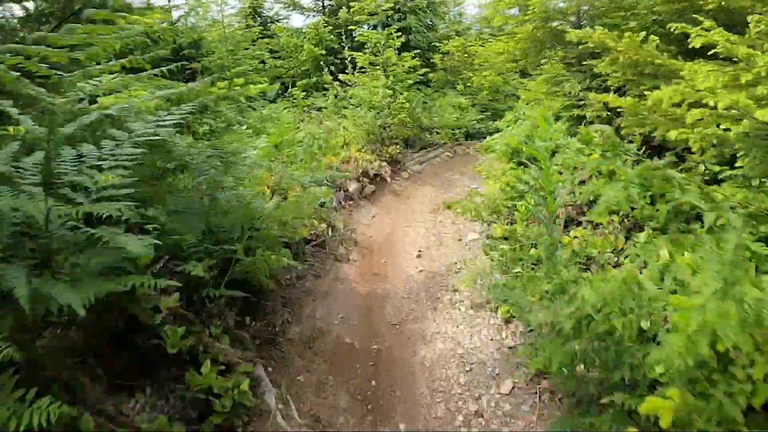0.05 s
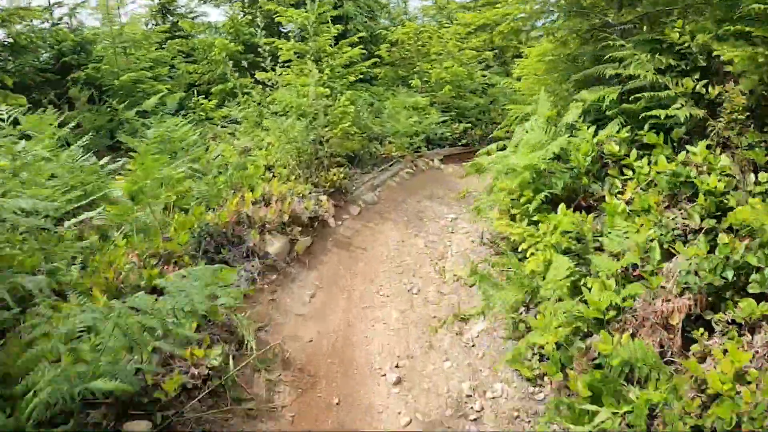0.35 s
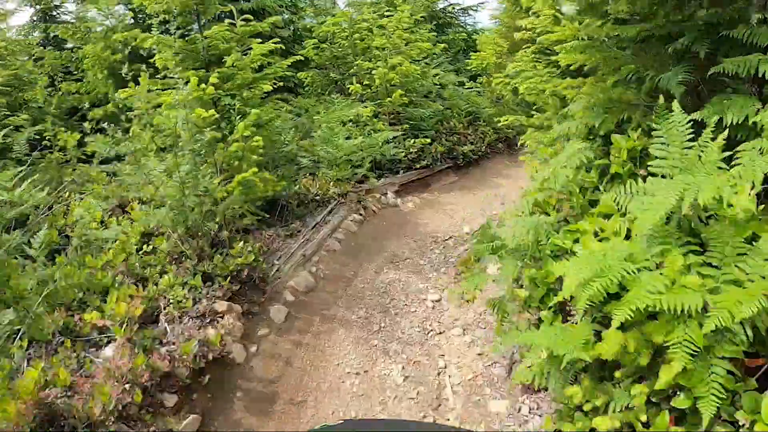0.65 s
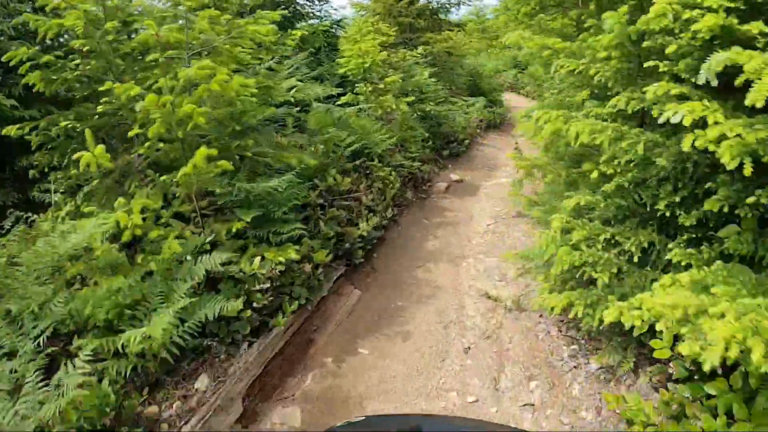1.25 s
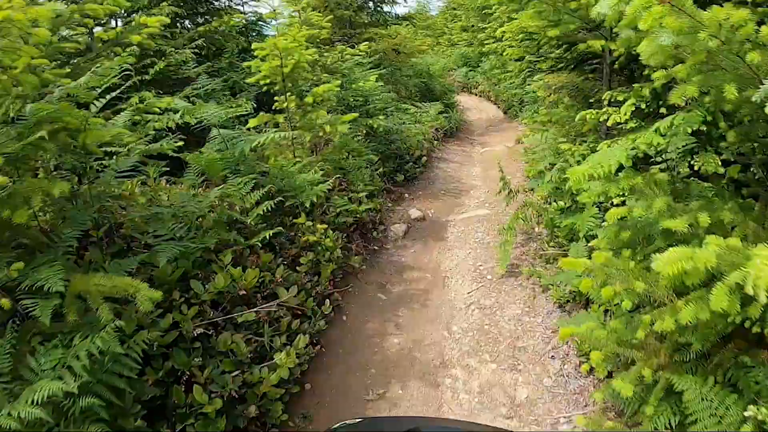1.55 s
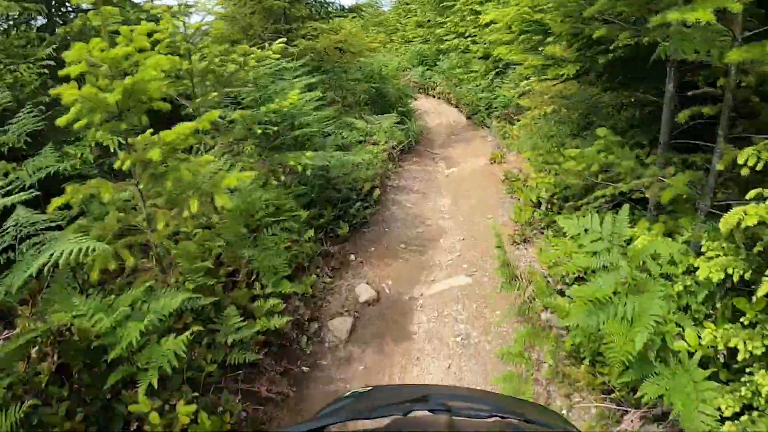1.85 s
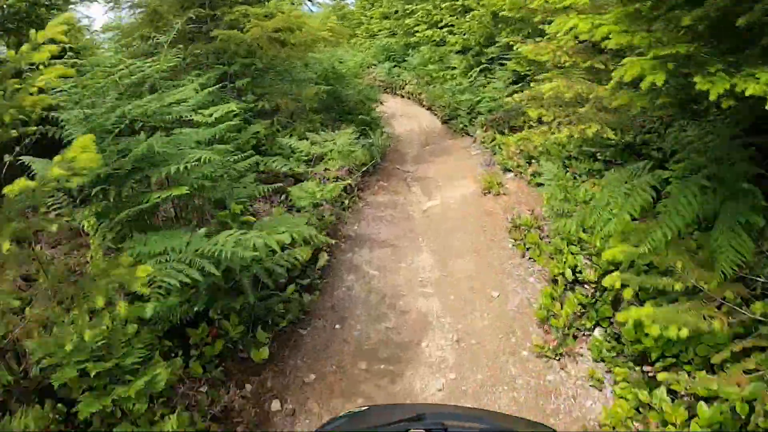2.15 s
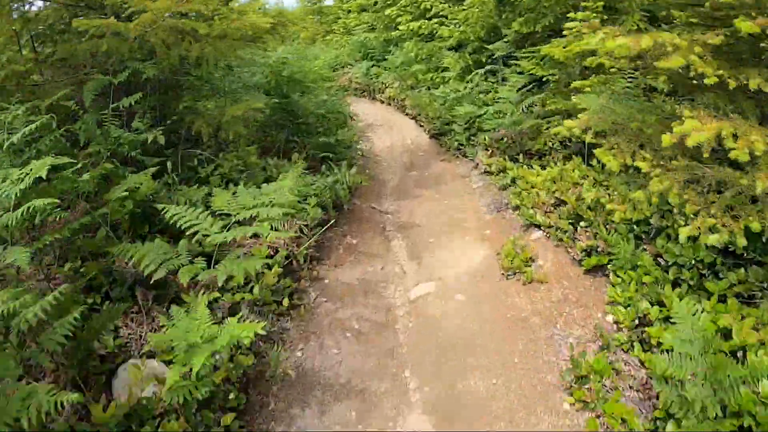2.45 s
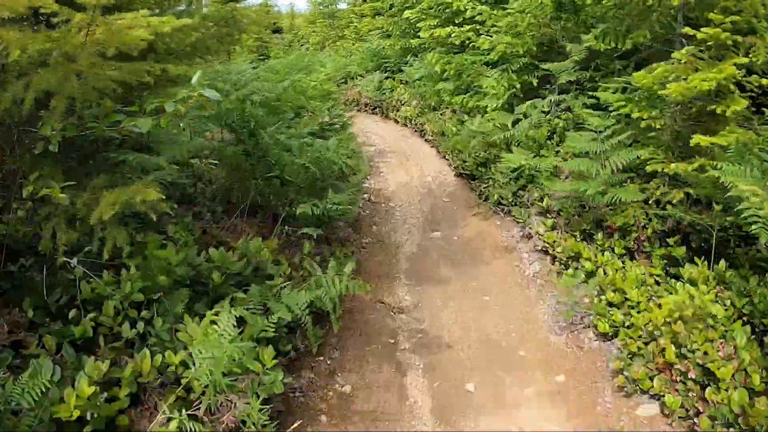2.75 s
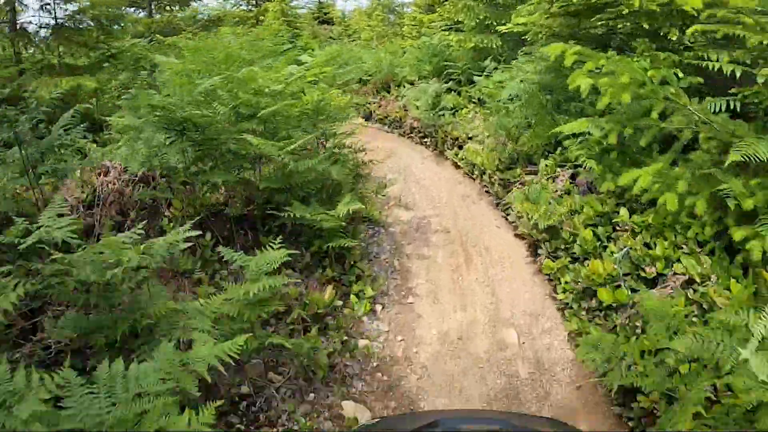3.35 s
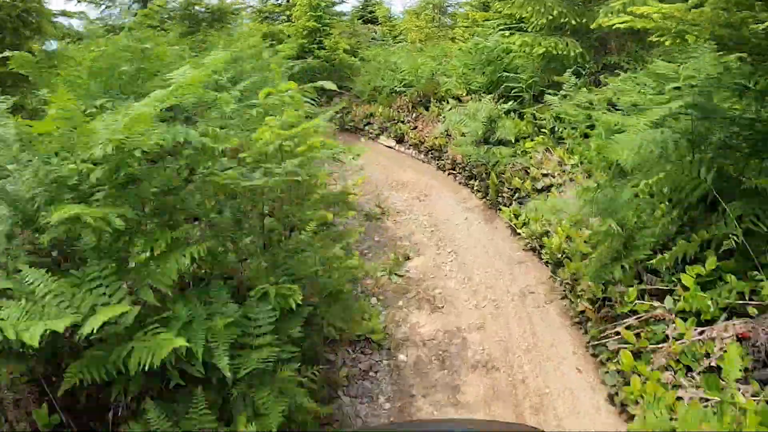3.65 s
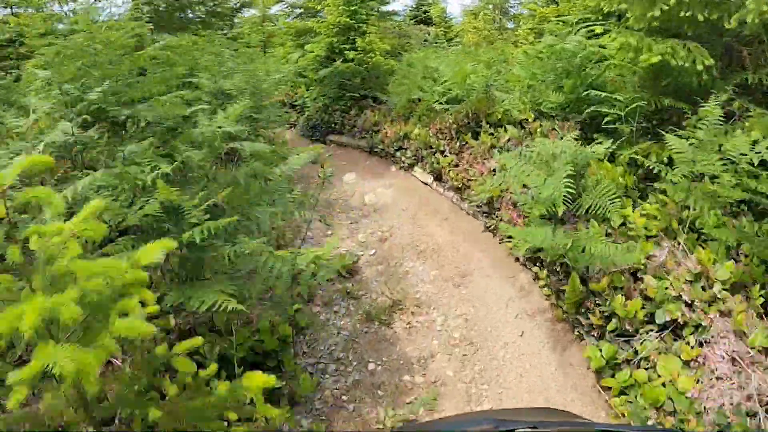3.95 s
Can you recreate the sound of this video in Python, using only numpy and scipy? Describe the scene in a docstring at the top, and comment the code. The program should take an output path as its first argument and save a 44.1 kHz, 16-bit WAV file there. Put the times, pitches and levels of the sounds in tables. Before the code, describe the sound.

Rough mountain bike brake squeals, one long and one short, over wind and gravel crunch.

```python
"""Mountain bike braking on gravel

Heard from the rider. Wind buffets the microphone; freewheel pawls buzz faintly.
Tyres crunch over grit, pop pebbles and knock against stones; the chain slaps the frame.
The disc brake whistles very high, squeals in rough stick-slip bursts, and bites again at the end."""
import sys
import numpy as np
from scipy import signal
from scipy.fft import rfft, irfft
from scipy.io import wavfile
from scipy.ndimage import uniform_filter1d

SR = 44100
rng = np.random.default_rng(int(sys.argv[2]) if len(sys.argv) > 2 else 0)


def dump_mix(stems):
    """Bounce the given channels to the path in sys.argv[1] as a 16-bit WAV at rate SR."""
    frames = np.atleast_2d(stems).T  # one column per channel
    limited = np.clip(frames, -1, 1)  # hard clip at full scale
    pcm = np.round(limited * 32767).astype(np.int16)
    wavfile.write(sys.argv[1], SR, pcm)


N = 176400

# wind spectrum (frequency [Hz], relative density [dB])
WIND_SPECTRUM = [(8.8, -29), (15, -4.5), (53, 2), (106, -3), (132, -5), (165, -15.5), (201, -15.5),
                 (240, -22.5), (420, -33), (550, -52), (920, -120)]
# wind strength (time [s], rumble [dB], buffeting [dB])
WIND_LEVELS = [(0.0, -20, -26), (0.34, -31, -31.5), (0.38, -21.5, -26.5), (0.78, -24.5, -26.5),
               (0.81, -21.5, -22.5), (1.11, -28, -33), (1.18, -20.5, -35), (1.25, -22, -21),
               (1.28, -22.5, -27.5), (1.54, -20, -26.5), (1.78, -20.5, -30.5), (2.18, -23.5, -27.5),
               (2.23, -27, -32.5), (2.38, -23.5, -21), (2.43, -20.5, -31.5), (2.64, -23, -21),
               (3.95, -23, -33.5), (4.0, -28, -26.5)]
# hub resonances (frequency [Hz], width [Hz], relative level [dB])
HUB_MODES = [(2230, 290, 1), (6270, 450, -0.5), (7570, 460, 4), (10100, 960, -8.5)]
# tyre rush spectrum (frequency [Hz], relative density [dB])
TYRE_SPECTRUM = [(150, -6), (260, -5.5), (400, -6), (650, -7.5), (950, -4.5), (1300, -7.5), (1750, -10),
                 (2300, -12), (3000, -16.5), (3800, -17), (4700, -21.5), (5400, -24.5), (6800, -28),
                 (8300, -30.5), (10000, -36), (11300, -39.5), (13500, -52)]
# tyre rush bands before trim (time [s], low [dB], middle [dB], upper [dB], treble [dB])
TYRE_LEVELS = [(0.03, -40.5, -43.5, -43, -52.5), (0.25, -37.5, -41.5, -46.5, -50),
               (0.35, -34.5, -42, -43.5, -49.5), (0.48, -30.5, -35, -39.5, -49),
               (0.6, -31, -36, -41.5, -45.5), (0.7, -29, -33.5, -41.5, -47), (0.8, -35.5, -36.5, -42, -51),
               (0.92, -39, -36, -45, -52.0), (1.1, -37.5, -39.5, -41, -48.5), (1.27, -49, -40, -39.5, -51),
               (1.42, -52, -41, -46, -54), (1.6, -43.5, -48.5, -50, -55.5),
               (1.8, -44.0, -49.0, -51.0, -56.5), (2.0, -42, -46, -47, -53.5),
               (2.18, -39.5, -48.5, -48.5, -52.5), (2.32, -40, -38, -40, -52),
               (2.48, -33.5, -41.5, -48, -51), (2.62, -36.5, -37, -44.5, -51.5),
               (2.74, -32.5, -35, -38, -48), (2.86, -40.5, -37.5, -45.5, -49), (3.0, -35, -38.5, -50, -51),
               (3.12, -35.5, -41.0, -43.5, -51), (3.24, -36.5, -40, -42.5, -48.0),
               (3.34, -31, -32, -40.0, -48.5), (3.46, -37.0, -36.5, -41.5, -46.5),
               (3.55, -34, -43, -45.5, -51.5), (3.7, -41.5, -37.5, -45, -49.5),
               (3.84, -33.5, -37.0, -40, -49.5), (3.97, -43, -35, -42.5, -50)]
# stone hits (time [s], gain [dB], ring pitch [Hz], treble gain [dB], decay [s])
STONE_HITS = [(.372, -21.5, 1684, -8.5, 0.013), (.454, -22, 620, -9, 0.024), (.542, -9, 1087, -22, 0.013),
              (.566, -12.5, 974, -14, 0.013), (.6, -18.5, 693, -16, 0.015), (.625, -21, 475, -15, 0.012),
              (.716, -25, 1072, -7, .011), (.847, -13.5, 1056, -16, 0.0088), (.98, -21, 1135, -9, 0.007),
              (1.073, -19, 896, -9, 0.011), (1.156, -12, 1290, -21, 0.005), (1.25, -25, 1280, -15, 0.01),
              (1.47, -21.5, 1250, -21, 0.0039), (1.68, -30, 2470, -3, 0.0062),
              (2.244, -21, 1010, -9, 0.014), (2.396, -16, 607, -8, 0.0068),
              (2.422, -16.5, 1052, -16.5, 0.015), (2.531, -20, 1120, -4.5, .012),
              (2.615, -16, 950, -21, .009), (2.724, -15, 1260, -31, 0.01), (2.782, -16.5, 747, -19, 0.0081),
              (2.85, -23, 600, -12, 0.0096), (2.949, -19, 840, -13, .009), (3.006, -18, 880, -24, 0.014),
              (3.18, -22.5, 1390, -7.5, 0.031), (3.288, -16, 1420, -19.5, 0.02),
              (3.334, -16, 1256, -19, 0.018), (3.39, -20, 916, -24, 0.0086),
              (3.473, -18, 936, -16.5, 0.017), (3.56, -24, 500, -9.5, 0.013), (3.613, -19, 670, -20, 0.023),
              (3.703, -19, 950, -16, 0.01), (3.766, -19.5, 1123, -16, 0.011),
              (3.992, -12.5, 1120, -20, 0.0057)]
# knock spectrum (frequency [Hz], relative density [dB])
KNOCK_SPECTRUM = [(120, -33), (350, -3.5), (700, -4), (1100, -4.5), (1700, -3.5), (2600, -6), (3300, -13.5),
                  (4200, -23), (7500, -36.5), (13000, -52)]
# chain hits on the frame (time [s], gain [dB], decay [s])
CHAIN_SLAPS = [(2.728, -33.5, 0.012), (2.745, -44, .025), (3.768, -46, .01)]
# chain resonances (frequency [Hz], width [Hz], relative level [dB])
CHAIN_MODES = [(3800, 700, 3), (4620, 200, 1.5), (5600, 350, -0.5), (6300, 250, -3), (7470, 280, -8),
               (8700, 600, -11), (10000, 400, -13), (12000, 1100, -18)]
# pings of loose parts (time [s], pitch [Hz], gain [dB])
METAL_PINGS = [(2.807, 4600, -43), (3.196, 4360, -38.5), (3.346, 4430, -40)]
# pad whistle (time [s], pitch [Hz], level [dB])
PAD_WHISTLE = [(.56, 10900, -82), (.585, 10950, -52), (.61, 10760, -70), (.71, 10700, -71),
               (.735, 10550, -50), (.78, 10600, -51), (.81, 10850, -47), (.85, 11000, -52),
               (.9, 11200, -43), (.96, 10980, -43.5), (1.01, 10750, -45), (1.025, 10750, -66),
               (1.065, 10400, -69), (1.095, 10800, -46), (1.14, 10950, -50), (1.165, 11000, -63),
               (1.235, 11000, -53), (1.27, 11100, -65), (1.305, 11100, -47), (1.35, 10850, -48),
               (1.39, 10700, -48.5), (1.43, 10700, -64), (1.52, 11040, -85)]
# pad grip (time [s], squeal pitch [Hz], roughness [0-1])
PAD_GRIP = [(.98, 1614, .3), (1.04, 1566, 0.4), (1.11, 1562, 0.6), (1.19, 1601, 0.62), (1.26, 1572, 0.67),
            (1.32, 1570, 0.82), (1.39, 1607, 0.23), (1.44, 1578, .08), (1.5, 1594, 0.24),
            (1.55, 1560, 0.65), (3.94, 1603, 0.28), (3.98, 1552, 0.77)]
# three squeal bursts (time [s], fundamental [dB], octave [dB], upper overtones [dB])
FIRST_BURST = [(.785, -42, -65, -75), (.81, -43, -58, -70), (.835, -34.5, -71, -70), (.85, -61, -69, -75)]
LONG_BURST = [(0.97, -65, -57, -59), (0.988, -28.5, -62, -65), (1.002, -19, -30, -55),
              (1.014, -28.5, -32, -51), (1.03, -17, -33, -37), (1.066, -30.5, -29, -46.5),
              (1.096, -25.5, -29.5, -48), (1.108, -21, -33, -47), (1.128, -24, -45, -60),
              (1.14, -20, -34, -57), (1.182, -21.5, -31, -38.5), (1.21, -17, -24.5, -41.5),
              (1.238, -25, -41, -42.5), (1.272, -24.5, -46, -52), (1.31, -39, -44, -62),
              (1.364, -31.5, -53, -58), (1.396, -18.5, -44, -56), (1.414, -20.5, -36.5, -43.5),
              (1.45, -14.5, -34.5, -46.5), (1.474, -24, -38, -41), (1.508, -21, -38, -48),
              (1.518, -32.5, -41, -57), (1.614, -45.5, -60, -76), (1.62, -47, -65, -83)]
LAST_BURST = [(3.91, -59, -57, -62), (3.928, -34, -46, -58), (3.939, -16.5, -51, -53),
              (3.951, -33, -31, -40), (3.969, -18.5, -33.5, -35.5), (3.984, -30, -34, -44),
              (4.0, -32, -41, -46)]
# squeal harmonics 3-8 (offset from the upper overtone level [dB])
HARMONIC_OFFSETS_DB = [0.5, -4.5, -14, -21, -22.5, -33]

TIME_S = np.arange(N) / SR
ATTACK_S = 0.00092


def undb(db):
    """Decibels to gain."""
    return 10 ** (np.asarray(db) / 20)


def unit(x):
    """Scale to rms 1."""
    return x / np.sqrt(np.mean(np.abs(x) ** 2))


def curve(rows, column=1):
    """Table column, linearly interpolated in time."""
    rows = np.array(rows)
    return np.interp(TIME_S, rows[:, 0], rows[:, column])


def colour(x, spectrum):
    """Filter by (Hz, dB) points; rms 1."""
    hz, db = np.array(spectrum).T
    bins_hz = np.maximum(np.arange(N // 2 + 1) * SR / N, 1)
    gain = undb(np.interp(np.log(bins_hz), np.log(hz), db))
    return unit(irfft(rfft(x) * gain, N))


def split(x, hz):
    """Bands below and above hz."""
    low = signal.sosfiltfilt(signal.butter(3, hz, fs=SR, output="sos"), x)
    return low, x - low


def wander(hz):
    """Complex noise up to about hz; rms 1."""
    bins_hz = np.fft.fftfreq(N, 1 / SR)
    noise = rng.standard_normal(N) + 1j * rng.standard_normal(N)
    return unit(np.fft.ifft(noise / (1 + (bins_hz / hz) ** 4)))


def walk(hz):
    """Real noise up to about hz; rms 1."""
    return unit(wander(hz).real)


def phase_rad(hz):
    """Phase of a changing frequency."""
    return 2 * np.pi * np.cumsum(hz) / SR


def carrier(hz):
    """Steady complex tone."""
    return np.exp(2j * np.pi * hz * TIME_S)


def ringing(modes):
    """Resonances driven by random contact; rms 1."""
    return unit(sum(undb(db) * (wander(width_hz) * carrier(hz)).real for hz, width_hz, db in modes))


def blow(start_s, decay_s):
    """Impact envelope: quick attack, exponential decay."""
    age_s = np.maximum(TIME_S - start_s, 0)
    return (1 - np.exp(-age_s / ATTACK_S)) * np.exp(-np.minimum(age_s / decay_s, 20))


def wind(smooth_s=0.046):
    """Eddies buffet the microphone with fairly even force."""
    air = colour(rng.standard_normal(N), WIND_SPECTRUM)
    window = int(smooth_s * SR)
    power = uniform_filter1d(uniform_filter1d(air ** 2, window), window)
    evened = air / (power + 1e-9) ** 0.26
    rumble, buffet = split(evened, hz=87.4)
    return (unit(rumble) * undb(curve(WIND_LEVELS, 1) + 0.17)
            + unit(buffet) * undb(curve(WIND_LEVELS, 2) + 0.66))


def freewheel(ticks_per_s=160, decay_cycles=0.98, level_db=-60):
    """Pawls tick rapidly and ring thin hub resonances."""
    rate_hz = ticks_per_s * (1 + 0.041 * walk(hz=1.86))
    cycle = phase_rad(rate_hz) / (2 * np.pi) % 1
    ticks = uniform_filter1d(np.exp(-cycle / decay_cycles), size=30)
    return undb(level_db) * unit(ringing(HUB_MODES) * ticks)


def tyres(grains_per_s=300, spread_db=3, decay_s=0.004, flicker_db=1.23):
    """Grit cracks under the knobs: short grains over a smooth rush."""
    sizes = undb(spread_db * np.minimum(rng.exponential(size=N), 4.5))
    grains = sizes * (rng.random(N) < grains_per_s / SR)
    energy = signal.lfilter([1], [1, -np.exp(-1 / (decay_s * SR))], grains ** 2)
    energy /= energy.mean()

    def rush(grit_share):
        envelope = np.sqrt(1 - grit_share + grit_share * energy)
        return colour(rng.standard_normal(N) * envelope, TYRE_SPECTRUM)

    low, rest = split(rush(grit_share=0.57), hz=648)
    middle, rest = split(rest, hz=1920)
    upper, _ = split(rest, hz=3700)
    _, treble = split(rush(grit_share=0.29), hz=3700)
    bands = [band * undb(flicker_db * walk(hz=38)) for band in (low, middle, upper)] + [treble]
    trim_db = (-1.53, -2.14, -2.1, -1.08)
    return sum(unit(band) * undb(curve(TYRE_LEVELS, k + 1) + trim_db[k]) for k, band in enumerate(bands))


def pebbles(pops_per_s=77, centre_hz=1261, spread_oct=1.447, spread_db=3.5, decay_cycles=6.7):
    """Pebbles pop from under the tread and ring briefly, louder as the tyre rush swells."""
    length = 2000
    out, age_s = np.zeros(N + length), np.arange(length) / SR
    base_db = curve(TYRE_LEVELS, 2) - 3.5
    for place, pitch, size in rng.random((int(pops_per_s * N / SR), 3)):
        start = int(place * N)
        octaves = spread_oct * (2 * pitch - 1)
        cycles = centre_hz * 2 ** octaves * age_s
        db = base_db[start] + spread_db * min(-np.log(1 - size), 3) - 5 * max(octaves, 0)
        envelope = (1 - np.exp(-cycles)) * np.exp(-cycles / decay_cycles)
        out[start:start + length] += undb(db) * envelope * np.sin(2 * np.pi * cycles)
    return out[:N]


def stones(dull_db=-7, bright_db=1.5, ring_db=-13, ring_width_hz=77):
    """Larger stones knock the tyres and rattle the bike: a damped crunch around one short ring."""
    dull, bright = split(colour(rng.standard_normal(N), KNOCK_SPECTRUM), hz=1450)
    shake, out = wander(ring_width_hz), np.zeros(N)
    for start_s, db, hz, treble_db, decay_s in STONE_HITS:
        ring = np.sqrt(2) * (shake * carrier(hz)).real
        crunch = undb(dull_db) * dull + undb(bright_db + treble_db) * bright
        out += undb(db) * blow(start_s, decay_s) * (crunch + undb(ring_db) * ring)
    return out


def chain():
    """The chain slaps the frame: bright clatter."""
    envelope = sum(undb(db) * blow(start_s, decay_s) for start_s, db, decay_s in CHAIN_SLAPS)
    return envelope * ringing(CHAIN_MODES)


def loose_parts(width_hz=150, decay_s=0.014):
    """Small metal parts give gritty pings."""
    buzz = np.sqrt(2) * wander(width_hz)
    return sum(undb(db) * blow(start_s, decay_s) * (buzz * carrier(hz)).real
               for start_s, hz, db in METAL_PINGS)


def whistle(width_hz=290, skirt_hz=600, mirror_hz=11960, alias_db=-11):
    """Raspy pad whistle sways with each wheel turn; recorder aliasing mirrors it faintly about 12 kHz."""
    rasp = unit(wander(width_hz) + 0.08 * wander(skirt_hz)) * undb(curve(PAD_WHISTLE, 2))
    tone = np.sqrt(2) * rasp * np.exp(1j * phase_rad(curve(PAD_WHISTLE)))
    alias = tone.conj() * carrier(2 * mirror_hz)
    return (tone + undb(alias_db) * alias).real


def rotor(decay_s=0.058, gain_db=-14.5):
    """The rotor, driven by the long burst, rings on briefly after the pads let go."""
    braking = (TIME_S > LONG_BURST[0][0]) & (TIME_S < LONG_BURST[-1][0])
    drive = braking * undb(curve(LONG_BURST)) ** 2
    pole = np.exp(-2 / (decay_s * SR))
    energy = signal.lfilter([1 - pole], [1, -pole], drive + 1e-18)
    tone = np.sqrt(2) * (wander(hz=24) * np.exp(1j * phase_rad(curve(PAD_GRIP)))).real
    return undb(gain_db) * np.sqrt(energy) * tone


def burst_gain(column):
    """One level column of all squeal bursts as gain, each faded in and out."""
    gain = np.zeros(N)
    for rows in (FIRST_BURST, LONG_BURST, LAST_BURST):
        fade_in = np.clip((TIME_S - rows[0][0]) / 0.016, 0, 1)
        fade_out = np.clip((rows[-1][0] - TIME_S) / 0.04 + 1, 0, 1)
        gain += fade_in * fade_out * undb(curve(rows, column))
    return gain


def squeal(chatter_hz=87, swing_hz=59, jitter_hz=16, flutter_hz=59.4, skirt_hz=142):
    """The rotor sticks and slips at one mode; pad chatter shakes pitch and level when grip is rough."""
    roughness = curve(PAD_GRIP, 2)
    chatter = np.sin(phase_rad(chatter_hz * (1 + 0.1136 * walk(hz=12.75))))
    deviation_hz = swing_hz * chatter + jitter_hz * walk(hz=290)
    phase = phase_rad(curve(PAD_GRIP) + roughness * deviation_hz)
    fundamental, octave, upper = (burst_gain(column) for column in (1, 2, 3))
    gains = [fundamental, octave] + [undb(db) * upper for db in HARMONIC_OFFSETS_DB]
    out = np.zeros(N)
    for order, gain in enumerate(gains, start=1):
        # higher harmonics smear into rasp
        depth = roughness + (0.23 * order if order > 1 else 0)
        flutter = unit(wander(flutter_hz) + 0.52 * np.sqrt(order) * wander(skirt_hz * np.sqrt(order)))
        partial = ((1 + depth * flutter) * np.exp(1j * order * phase)).imag
        out += gain * np.sqrt(2 / (1 + depth ** 2)) * partial
    return out


def scene():
    """Mono mix; all sources ride along with the microphone."""
    brake = squeal() + rotor() + whistle()
    ride = wind() + tyres() + stones() + chain() + loose_parts() + freewheel() + pebbles()
    return (brake + ride)[None]


def record(dry, cutoff_hz=13900):
    """Steep low-pass cuts the top."""
    return signal.sosfilt(signal.ellip(8, 0.2, 70, cutoff_hz, fs=SR, output="sos"), dry)


dry = scene()
out = record(dry)
dump_mix(out)
```